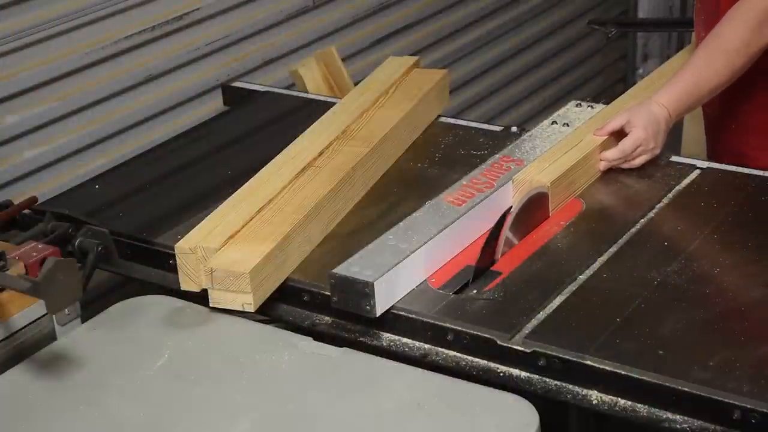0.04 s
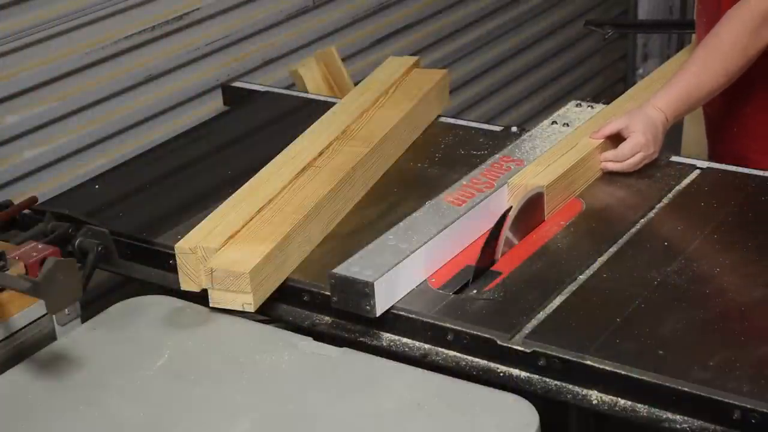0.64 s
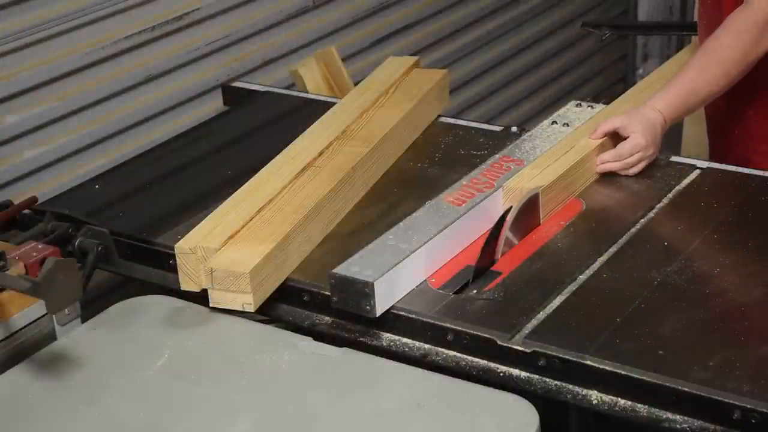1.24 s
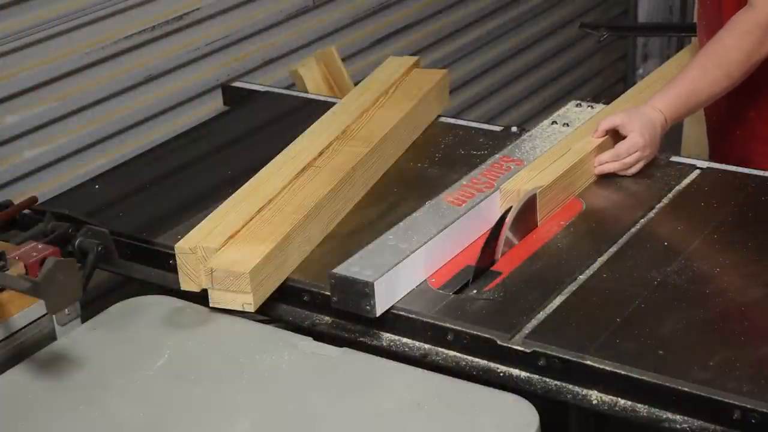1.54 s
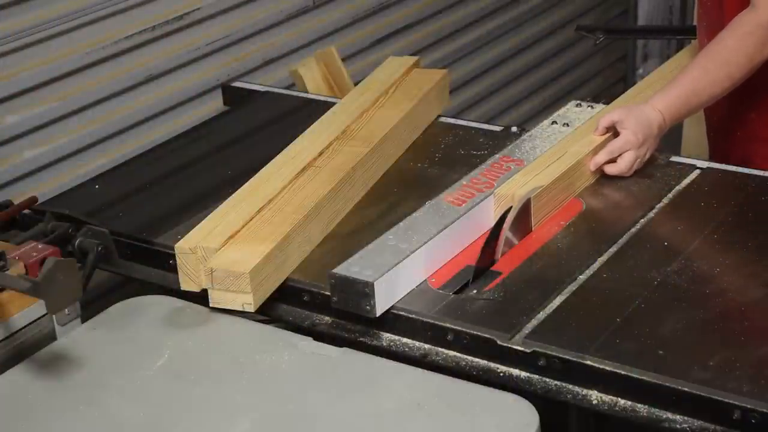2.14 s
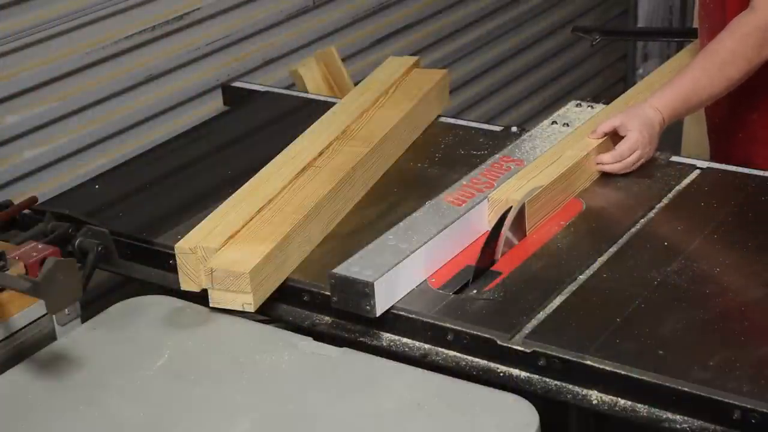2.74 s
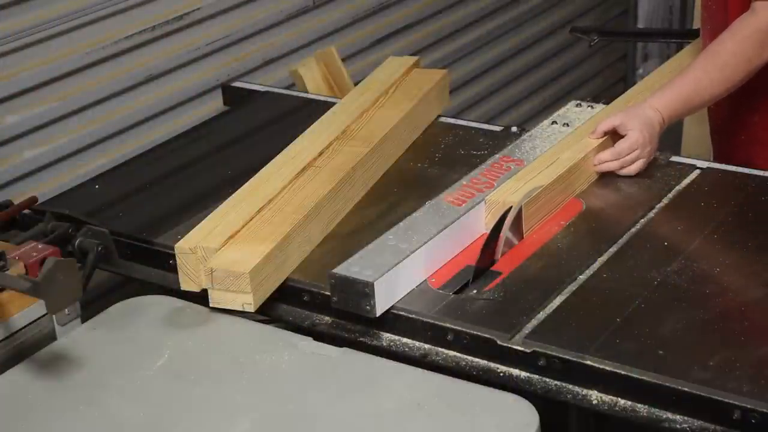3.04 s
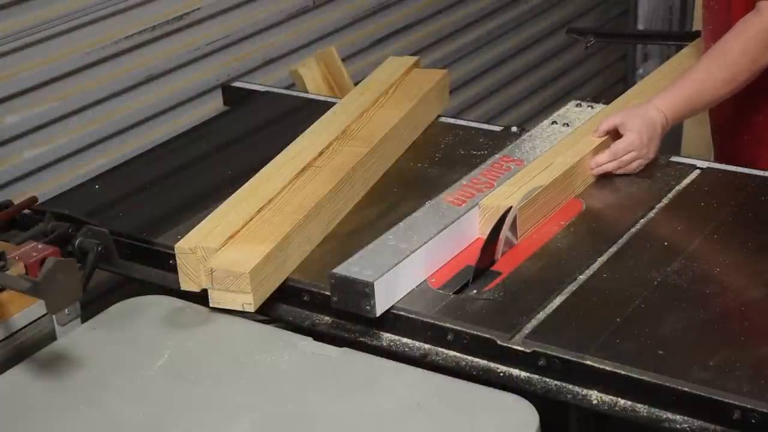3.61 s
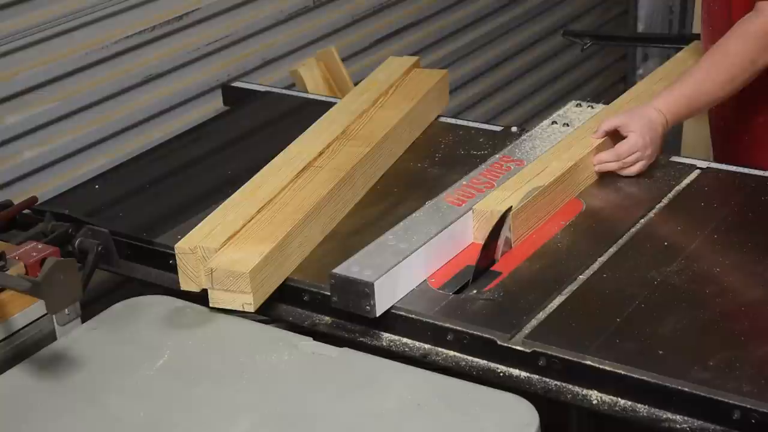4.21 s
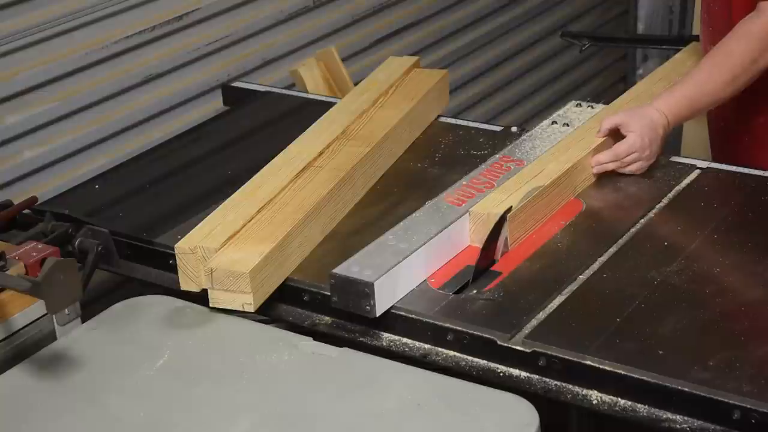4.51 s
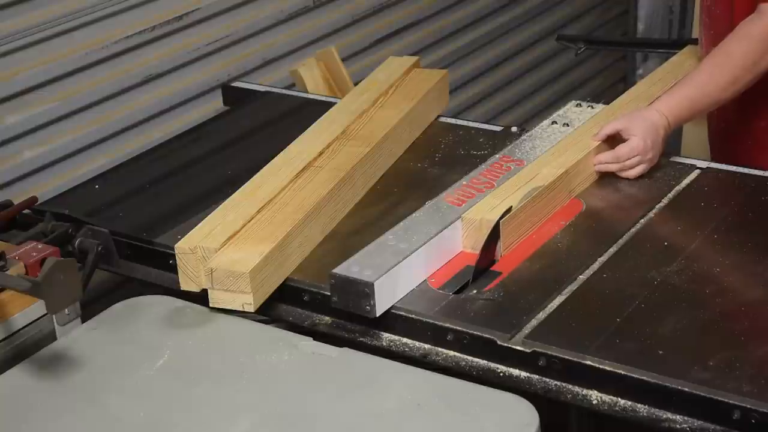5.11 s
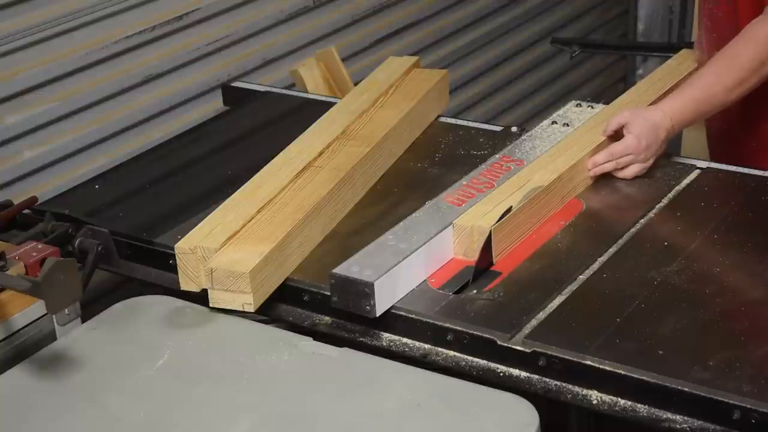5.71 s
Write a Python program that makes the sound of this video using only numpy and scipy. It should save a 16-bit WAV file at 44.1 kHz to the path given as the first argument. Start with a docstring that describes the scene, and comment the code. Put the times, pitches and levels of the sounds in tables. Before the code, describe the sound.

A table saw rips steadily through a long piece of wood, with a harsh rasp and ringing blade in a workshop.

```python
"""A workshop: a table saw rips a long wooden blank while an extractor fan hums to the right.
Forty teeth rasp in a pattern that repeats each turn, and chips spray at random. The steel plate
sings in its own modes, squeals briefly and chatters on hard grain. Whistles and motor hum
follow the blade speed, which sags a little as the cut deepens. The walls add a short reverb."""
import sys
import numpy as np
from scipy import signal
from scipy.fft import rfft, irfft
from scipy.io import wavfile
from scipy.ndimage import map_coordinates

SR = 44100
rng = np.random.default_rng(int(sys.argv[2]) if len(sys.argv) > 2 else 0)


def waveform_to_disk(signal):
    """Save audio, clipped to [-1, 1], as 16-bit WAV at the path in sys.argv[1]."""
    frames = np.transpose(np.atleast_2d(signal))
    scaled = np.clip(frames, -1, 1) * 32767
    samples = np.round(scaled).astype(np.int16)
    wavfile.write(sys.argv[1], SR, samples)


N = 253575
T = np.arange(N) / SR
FREQS = np.fft.rfftfreq(N, 1 / SR)
TEETH = 40
BURIED_S = 5.06  # blade fully inside the wood


def undb(db):
    """Decibels to gain."""
    return 10 ** (np.asarray(db) / 20)


def unit(x):
    """Scale to rms 1."""
    return x / np.sqrt(np.mean(x ** 2))


def curve(table):
    """A (time_s, value) table, interpolated per sample."""
    return np.interp(T, *np.transpose(table))


def spectrum_db(table):
    """A (freq_hz, level_db) table, interpolated over log frequency."""
    hz, db = np.transpose(table)
    return np.interp(np.log(FREQS + 1), np.log(hz), db)


def shape(x, gain):
    """Filter by a gain per frequency."""
    return irfft(rfft(x) * gain, N)


def walk(rate_hz, size=8192):
    """Smooth random drift, rms 1."""
    slow = irfft(rfft(rng.standard_normal(size)) / (1 + (FREQS[:size // 2 + 1] / rate_hz) ** 4))
    return unit(np.interp(T, np.linspace(0, T[-1], size), slow))


def pan(x, balance_db):
    """Place by left minus right level."""
    return x * undb(np.array([[balance_db], [-balance_db]]) / 2)


def ring(cycles, rough, shake_hz):
    """Tone shaken in level and phase by uneven driving, rms 1."""
    shake = 1 + rough * (walk(shake_hz) + 1j * walk(shake_hz))
    return unit(np.real(shake * np.exp(2j * np.pi * (cycles + rng.random()))))


def swell(peak_s, sigma_s):
    """Gaussian rise and fall, peak 1."""
    return np.exp(-.5 * ((T - peak_s) / sigma_s) ** 2)


def resonance(off_hz, width_hz):
    """Gain of a mode driven off its pitch."""
    return 1 / np.hypot(1, 2 * off_hz / width_hz)


def turn_pattern(turns, stages=9, size=600):
    """Noise that repeats each turn and slowly changes as the wood advances."""
    patterns = signal.resample(rng.standard_normal((stages + 1, size)), 8 * size, axis=1)
    stage = stages * T / T[-1]
    blend = stage % 1
    noise = map_coordinates(patterns, [stage, turns % 1 * (8 * size - 1)], order=1)
    return unit(noise / np.hypot(blend, 1 - blend))


def runout(turns, depth):
    """The blade runs out of true and bites harder once a turn."""
    return 1 + depth * np.cos(2 * np.pi * turns)


# hand feed pressure: time_s, level_db
FEED_PRESSURE = [(0.0, -37.5), (0.17, -38), (0.62, -39.5), (1.12, -36), (1.17, -38.5), (1.26, -36.5),
                 (4.39, -35.5), (4.47, -35.5), (4.55, -36), (4.77, -35), (4.85, -36.5), (5.25, -36.5),
                 (5.75, -36.5)]


def feed_db():
    """Feed pressure about its mean."""
    db = curve(FEED_PRESSURE)
    return db - db.mean()


def effort(start_db, buried_gain_db, db_per_feed_db=0):
    """Gain of a saw part as the blade sinks in and the feed varies."""
    return undb(start_db + buried_gain_db * np.minimum(T / BURIED_S, 1) + db_per_feed_db * feed_db())


# cut spectrum, before each band is levelled: freq_hz, level_db
CUT_SPECTRUM = [(100, -100), (280, -88), (500, -85), (850, -85), (1200, -74.5), (1600, -73), (2200, -78),
                (3200, -72), (6200, -68), (8500, -71), (10000, -72), (12000, -76.5), (14500, -81),
                (16000, -85)]
# peaks and hollows of blade, wood and table: freq_hz, width_hz, gain_db
CUT_RESONANCES = [(2800, 400, 3.2), (3850, 200, 3), (4170, 300, -3), (4600, 300, 3.5), (4980, 250, -7),
                  (5350, 200, 2), (5850, 200, 2), (6520, 150, 4), (6980, 150, 5), (8030, 300, 4),
                  (8500, 350, -4), (9200, 450, 6), (10750, 250, -3), (11300, 300, 2), (12250, 300, -2),
                  (13100, 350, 5), (14400, 250, 2)]
# knock, bite, teeth, rim hiss, dust: start_db, buried_gain_db, db_per_feed_db
CUT_BANDS = [(-44.5, -1.5, 1.64), (-39, -2.1, 1.44), (-37.5, 3, -0.18), (-33, -3, 0.37), (-46.5, 8, 0)]
# rim brushing the kerf: peak_s, boost_db, sigma_s
RIM_BRUSHES = [(.03, 2, 0.11), (0.467, 2, .06), (3.252, 1.5, 0.097), (4.308, 2.5, 0.021),
               (4.807, 1.5, 0.019), (5.51, 3, 0.087)]


def rasp(turns, pulsing=0.43, spray_db=1.0, flutter_db=0.67):
    """Teeth repeat their pattern, chips fly at random; a light cut is more regular."""
    load_db = feed_db()
    peaks_db = sum(db * resonance(FREQS - hz, width_hz) ** 2 for hz, width_hz, db in CUT_RESONANCES)
    colour = undb(spectrum_db(CUT_SPECTRUM) + peaks_db)
    regular = np.interp(FREQS, [700, 2500, 5700, 9000], [.08, .3, .29, .58])
    pattern = shape(turn_pattern(turns), np.sqrt(regular)) * undb(-.2 * load_db)
    chips = shape(rng.standard_normal(N), np.sqrt(1 - regular))
    chips *= undb(1.02 * load_db + spray_db * walk(23))
    tooth_pulse = 1 + pulsing * np.cos(2 * np.pi * TEETH * turns)
    force = (pattern + chips) * runout(turns, depth=0.018) * tooth_pulse
    # wood radiates the lows, teeth the middle, rim and dust the top
    lowpasses = [1 / (1 + (FREQS / edge_hz) ** 24) for edge_hz in (2400, 4950, 7900, 11800)]
    bands = np.diff(lowpasses, axis=0, prepend=0, append=1)
    knock, bite, teeth, rim, dust = (
        unit(shape(force, band * colour)) * effort(*levels) * undb(flutter_db * walk(7.2))
        for band, levels in zip(bands, CUT_BANDS))
    brush_db = sum(db * swell(peak_s, sigma_s) for peak_s, db, sigma_s in RIM_BRUSHES)
    return knock + bite + teeth + rim * undb(brush_db) + dust


# main plate mode: time_s, level_db
SING_LEVEL = [(0.0, -53), (0.82, -66.5), (1.18, -48), (1.46, -49.5), (2.02, -42), (2.18, -39.3),
              (2.95, -35), (3.65, -39.8), (3.91, -45.5), (4.1, -41.5), (4.33, -49.5), (4.5, -48.5),
              (4.69, -43), (4.8, -49.5), (5.1, -48), (5.33, -43.5), (5.39, -42), (5.62, -46), (5.72, -42)]
# its tuning: time_s, pitch_hz
SING_PITCH = [(1, 1301), (3, 1299), (4.5, 1299), (5.05, 1301), (5.4, 1295), (5.75, 1291)]
# weaker modes: pitch_hz, peak_db, db_per_sing_db
PLATE_MODES = [(658, -56.5, .8), (1036, -48.5, .55), (1236, -55, .2), (1498, -52, .5), (1562, -51, .8),
               (1658, -55, .3), (1665, -57, .3), (1753, -56, .5), (1760, -50.5, .25), (2150, -56, .5),
               (2347, -53.5, .25), (2545, -53, .5), (2869, -55, .2), (3095, -53, .25), (3272, -50, .4),
               (3445, -55, .4), (3752, -55, .1), (3910, -55, .05), (4640, -54, .05)]


def plate(turns, boost_db=3, stutter_db=3, flutter_db=1.0, damping_db_per_s=31):
    """The plate sings; rubbing the kerf breaks the tone into uneven strokes, one a turn."""
    sing_db = curve(SING_LEVEL)
    rubbing = swell(peak_s=4.97, sigma_s=0.29)
    cycles = np.cumsum(curve(SING_PITCH)) / SR
    main = ring(cycles, rough=.06 + .36 * rubbing, shake_hz=22)
    main *= undb(sing_db + boost_db + stutter_db * rubbing * walk(40))
    main *= runout(turns, depth=0.13 + 0.42 * rubbing)
    dip_db = sing_db - sing_db.max()
    weak = sum(ring(hz * T, rough=.55 - .45 * follow, shake_hz=6) * undb(db + follow * dip_db)
               for hz, db, follow in PLATE_MODES)
    damping_db = damping_db_per_s * np.maximum(T - BURIED_S, 0)  # wood stills the buried plate
    weak *= undb(flutter_db * walk(6.9) - damping_db)
    return main + weak * runout(turns, depth=0.013)


# tooth-rate tones: harmonic, start_db, buried_gain_db
TOOTH_HARMONICS = [(1, -58, 7.5), (2, -60, 9)]
# whistle at harmonic 3: time_s, level_db
WHISTLE_LEVEL = [(0, -36), (.25, -35.5), (.52, -30), (.78, -32.5), (.96, -37.5), (1.23, -44), (1.35, -33.5),
                 (1.58, -41), (2.2, -39), (2.8, -54), (4, -52), (4.6, -54.5), (4.9, -43), (5.75, -57)]
# thin whistle at harmonic 6: time_s, level_db
HIGH_WHISTLE_LEVEL = [(4.5, -87), (4.57, -55), (4.78, -50.5), (4.97, -56), (5.15, -48), (5.5, -45),
                      (5.75, -53)]


def tooth_tones(turns, flutter_db=0.5):
    """Tooth-rate harmonics; the third whistles most in the light cut, the sixth comes in thinly from about 4.5
    s as the blade slows."""
    strikes = TEETH * turns
    low = sum(ring(k * strikes, rough=0.43, shake_hz=20) * effort(*levels)
              for k, *levels in TOOTH_HARMONICS)
    whistle = ring(3 * strikes, rough=0.29, shake_hz=13) * undb(curve(WHISTLE_LEVEL))
    high = ring(6 * strikes, rough=.7, shake_hz=60) * undb(curve(HIGH_WHISTLE_LEVEL))
    return (low + whistle + high) * undb(flutter_db * walk(44)) * runout(turns, depth=0.44)


# sharp rim modes: pitch_hz, start_db, buried_gain_db
RIM_MODES = [(2631, -43, -6.5), (3305, -60, 8), (3940, -62, 12), (4151, -59, 10), (4474, -43, -9),
             (4533, -44.5, -1), (5388, -45, -14), (5411, -59, 13), (5593, -49, -5), (5781, -55, 6),
             (5850, -49, 0), (6040, -57, 12), (7288, -56, 8), (6510, -49, 1), (6580, -46, -3),
             (6972, -50, 7), (7236, -55, 8), (7560, -48, -2), (7942, -60, 16), (8050, -44, -4),
             (8086, -44, -1), (8886, -44, -2), (9055, -45, 0), (9112, -54, 10), (9206, -42, -2),
             (9409, -46, -3), (9935, -47, -3)]


def rim_modes(turns, speed_hz, width_hz=12, trim_db=-0.5):
    """Each mode picks out the nearest multiple of the blade speed; silent halfway between two."""
    out = 0
    for hz, *levels in RIM_MODES:
        harmonic = np.round(hz / speed_hz)
        off_hz = harmonic * speed_hz - hz
        drive = resonance(off_hz, width_hz) * np.cos(np.pi * off_hz / speed_hz)
        out += ring(harmonic * turns, rough=.22, shake_hz=14) * effort(*levels) * drive
    return out * undb(trim_db) * runout(turns, depth=0.048)


# motor and arbor hum: harmonic, start_db, buried_gain_db, db_per_feed_db
MOTOR_HARMONICS = [(1, -83, 8, 3), (2, -77.5, 7.5, 1), (3, -86.5, 16.5, 3), (4, -67, 4, 0),
                   (5, -58.5, -12, 5.5), (6, -58.5, -6, 1), (8, -70.5, 7.5, 3), (11, -74.5, 11, 1),
                   (12, -54.5, -15, 3), (13, -73.5, 3, 0), (15, -83, 20.5, -1)]


def motor(turns):
    """Motor and arbor hum at multiples of the blade speed."""
    hum = sum(ring(k * turns, rough=0.27, shake_hz=2.8) * effort(*levels)
              for k, *levels in MOTOR_HARMONICS)
    return pan(hum, balance_db=-3.5)


# fan hum: pitch_hz, level_db, balance_db
FAN_TONES = [(60.3, -83, 4), (114, -75.5, 1), (176, -73.5, -7.5), (354.8, -55.5, -14.5),
             (709, -67.5, -10.5), (1065, -56.5, 0)]
# air rush: freq_hz, relative_db
AIR_SPECTRUM = [(20, -21), (45, -24), (85, -9), (130, -2.5), (280, 12), (500, 11), (1000, 1), (4000, -30)]


def extractor_fan(air_db=-60):
    """The fan hums at its own steady speed and draws air."""
    hum = sum(pan(ring(hz * T, rough=.06, shake_hz=4) * undb(db), balance_db)
              for hz, db, balance_db in FAN_TONES)
    air = unit(shape(rng.standard_normal(N), undb(spectrum_db(AIR_SPECTRUM))))
    return hum + pan(air * undb(air_db), balance_db=-3.5)


# blade squeals and swells: pitch_hz, bursts of (peak_s, level_db, sigma_s)
SQUEAL_TONES = [(666, [(.05, -56.5, .2)]), (998, [(.11, -52.5, .16)]), (2792, [(.086, -49, .092)]),
                (1394, [(.15, -49.5, .015), (.225, -46, .018), (.42, -45, .022), (.505, -42.5, .025),
                (.615, -45.5, .03), (.775, -46, .04), (.92, -47, .018), (1.14, -50, .02),
                (1.28, -50, .03)]), (1663, [(.02, -41.5, .04), (.14, -41.3, .065), (.31, -44, .05),
                (.47, -50.5, .03), (.755, -47, .02), (.89, -43, .022), (.992, -43, .018), (1.23, -46, .02),
                (1.42, -44, .014), (1.56, -46, .025), (1.77, -46, .035)]), (2150, [(1.05, -51, .07),
                (1.22, -44.5, .055), (1.38, -43, .08), (1.545, -39, .05), (1.7, -40.5, .025),
                (1.82, -51.5, .03), (2, -51, .05)]), (1320, [(1.35, -52, .25)]), (2347, [(1.27, -48, .04),
                (1.98, -48, .04)]), (2869, [(1.14, -44, .02), (1.26, -47, .025), (1.37, -45, .025)]),
                (3095, [(1.183, -42, .035), (1.42, -47, .08)]), (5326, [(1.85, -44.5, .17),
                (2.35, -45.5, .17), (3.05, -43.5, .3)]), (5318, [(3.9, -45.5, .22)]),
                (9199, [(3.26, -33.5, .057)]), (3272, [(4.04, -49, .24)]), (1700, [(3.952, -47, .08)]),
                (2626, [(4, -42, .069)]), (1236, [(4.51, -46.5, .23), (5.15, -46, .12)]),
                (1498, [(4.72, -45.5, .069)])]


def squeals(turns):
    """Short squeals and swelling tones of the blade: plate rings and overtones of its rotation."""
    out = 0
    for hz, bursts in SQUEAL_TONES:
        power = sum((undb(db) * swell(peak_s, sigma_s)) ** 2 for peak_s, db, sigma_s in bursts)
        out += ring(hz * T, rough=.05, shake_hz=12) * np.sqrt(power)
    return out * runout(turns, depth=0.013)


# catches on hard grain: peak_s, centre_hz, spread_hz, level_db, sigma_s
GRAIN_CATCHES = [(.13, 5500, 300, -44, .05), (1.18, 4550, 300, -42, .04), (1.16, 3400, 700, -42, .025),
                 (1.86, 4580, 300, -43, .07), (1.8, 5700, 700, -44, .08), (3.0, 6550, 250, -39, .04),
                 (3.05, 3650, 600, -41, .02), (4.02, 5900, 400, -37.5, .08), (4.3, 5750, 400, -42, .07),
                 (4.44, 4400, 900, -42, .03), (4.678, 3600, 700, -36.5, .028),
                 (4.76, 5300, 400, -36.5, .025), (4.77, 3400, 600, -38.5, .018),
                 (4.88, 7000, 260, -35.5, .07), (5.2, 7100, 450, -39.5, .16), (5.1, 3900, 700, -42, .04),
                 (5.27, 3700, 900, -42, .025), (5.38, 4500, 800, -40, 0.023),
                 (5.4, 6000, 900, -35.5, 0.037), (5.55, 3700, 900, -42, .1)]


def chatter(turns, regular=0.86, grab_db=0.5):
    """Teeth grab hard grain unevenly, once a turn, and ring a band of the plate in short surges."""
    force = np.sqrt(regular) * turn_pattern(turns) + np.sqrt(1 - regular) * rng.standard_normal(N)
    force *= runout(turns, depth=0.27) * undb(grab_db * walk(65))
    out = 0
    for peak_s, centre_hz, spread_hz, db, sigma_s in GRAIN_CATCHES:
        band = resonance(FREQS - centre_hz, 2 * spread_hz) ** 4
        out += unit(shape(force, band)) * undb(db) * swell(peak_s, sigma_s)
    return out


# left-right phase and balance: freq_hz, left_lead_rad, balance_db
PHASE_BALANCE = [(0, 0, -2.5), (1300, .2, .3), (2400, .3, -.7), (4500, .8, -1.4), (7200, 1.4, -1.8),
                 (9200, 2, -1.5), (10400, 2.5, -.8), (12000, 2.85, 0), (14000, 3.1, 0), (15500, 3.9, 0)]


def widen(x):
    """Left-right phase and balance by frequency; the top treble, near antiphase, sounds wide."""
    hz, *columns = np.transpose(PHASE_BALANCE)
    lead_rad, balance_db = (np.interp(FREQS, hz, column) for column in columns)
    side = np.array([[.5], [-.5]])
    return shape(x, np.exp(1j * side * lead_rad) * undb(side * balance_db))


def walls(x, t60_s=.33, gap_s=.004, cutoff_hz=12000):
    """Dense reflections, unrelated left and right, dulled above the cutoff."""
    t = T[:SR // 2]
    tail = rng.standard_normal((2, len(t))) * undb(-60 * t / t60_s) * (t > gap_s)
    tail /= np.sqrt(np.sum(tail ** 2, axis=1, keepdims=True))
    dulled = shape(x, 1 / (1 + (FREQS / cutoff_hz) ** 6))
    return shape(dulled, rfft(tail, N))


# sagging blade rotation: time_s, speed_hz
BLADE_SPEED = [(0, 66.62), (0.5, 66.33), (1.3, 66.14), (1.68, 65.8), (3.05, 65.75), (3.5, 65.64),
               (4.0, 65.68), (4.6, 65.3), (4.76, 65.35), (4.86, 65.14), (5.05, 65.17), (5.35, 64.78),
               (5.75, 64.5)]


def scene():
    """Saw and fan in the workshop."""
    speed_hz = curve(BLADE_SPEED)
    turns = np.cumsum(speed_hz) / SR
    cut = rasp(turns) + chatter(turns)
    tones = plate(turns) + squeals(turns) + tooth_tones(turns) + rim_modes(turns, speed_hz)
    reverb = walls(undb(-3.5) * cut + undb(-14.5) * tones)
    return widen(cut + tones) + reverb + motor(turns) + extractor_fan()


def record(dry, cutoff_hz=15750):
    """Steep low-pass."""
    return signal.sosfilt(signal.ellip(10, .2, 80, cutoff_hz, fs=SR, output="sos"), dry)


dry = scene()
out = record(dry)
waveform_to_disk(out)
```